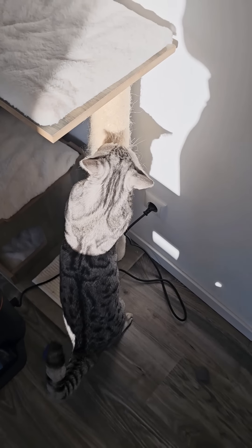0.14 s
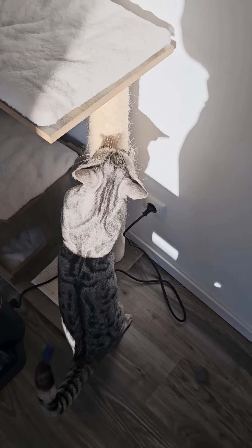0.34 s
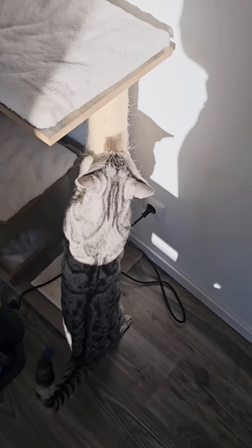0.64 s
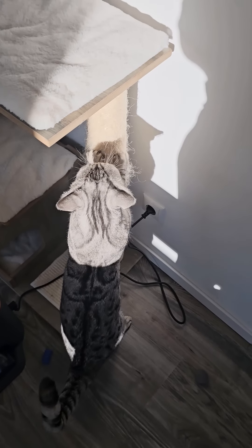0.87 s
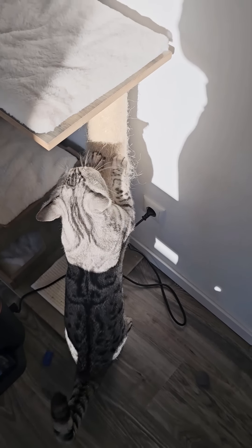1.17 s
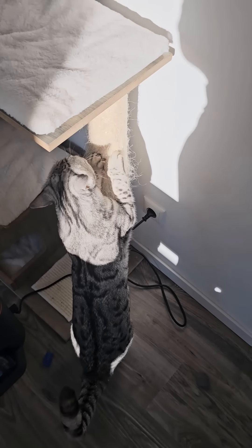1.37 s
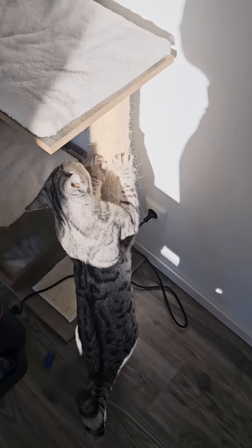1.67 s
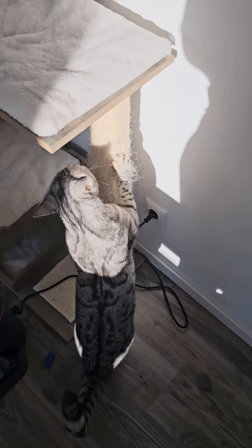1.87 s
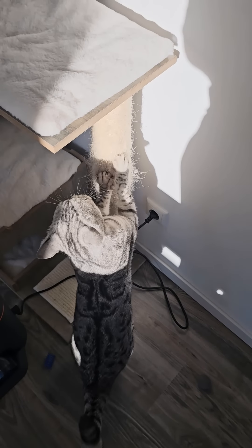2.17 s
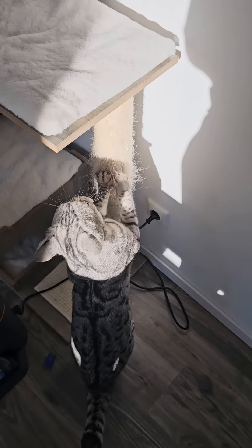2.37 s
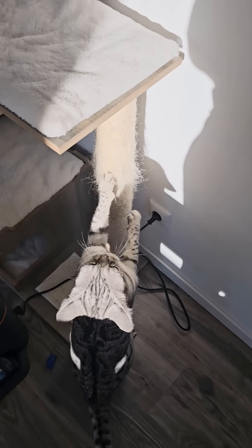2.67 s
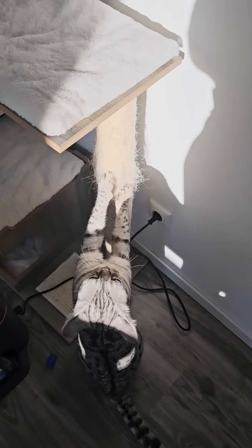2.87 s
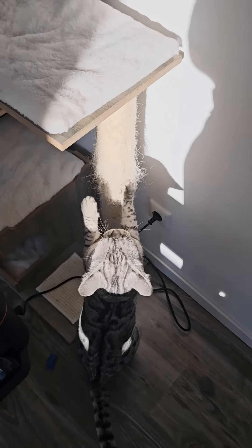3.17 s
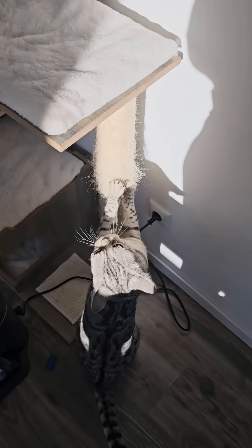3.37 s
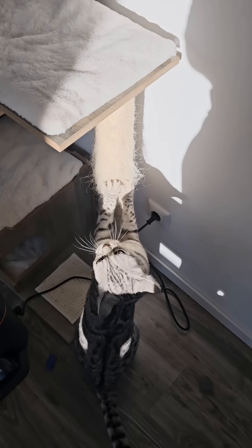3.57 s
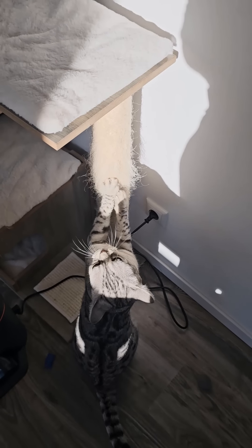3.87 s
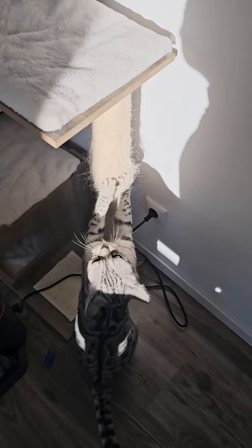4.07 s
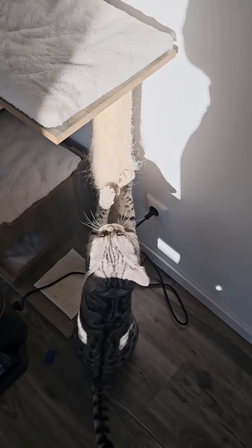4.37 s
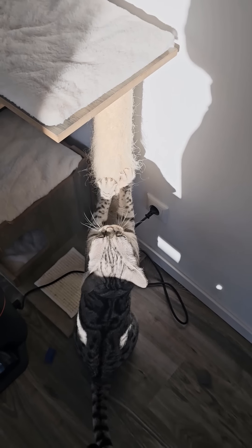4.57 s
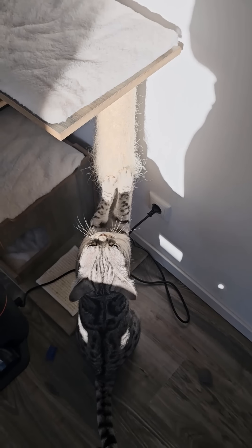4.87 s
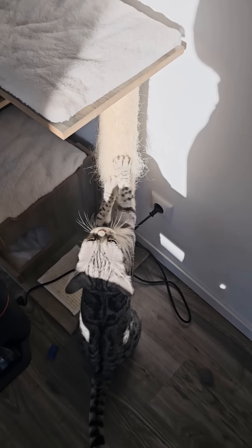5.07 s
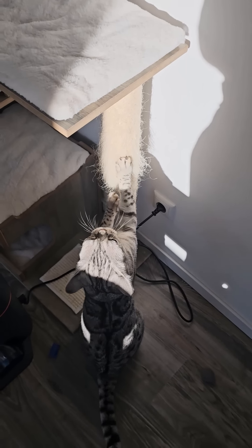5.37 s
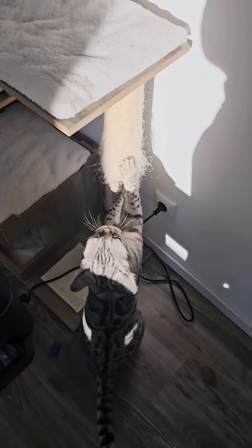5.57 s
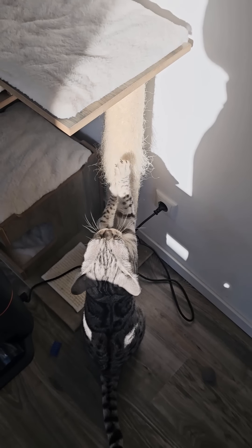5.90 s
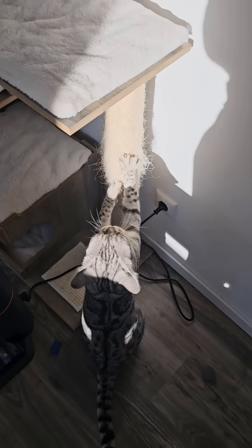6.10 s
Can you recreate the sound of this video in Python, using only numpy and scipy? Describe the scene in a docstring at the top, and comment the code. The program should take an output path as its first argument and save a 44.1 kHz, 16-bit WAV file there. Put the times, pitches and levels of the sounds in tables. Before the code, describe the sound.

A cat claws a rope-wrapped post, heard close in stereo in a bare room with quick reflections and a roughly half-second tail. A crack and hollow knock open at 0.01 s. A dry rustling drag from 0.2 swells into clustered snaps and a thud at 0.45-0.5, followed by weakening rocking bumps. Longer uneven drags run from 0.8 to 1.75, ending in a bright tick, crack and deep thud. Another pull releases in the sharpest crack at 2.33, with low bumps after. Lighter snaps cluster at 3.0-3.1 and 3.5-3.8, then 4.16, with quieter ones at 4.75 and 4.87. A strong double crack with a twangy knock lands at 5.1, rocking the base. From 5.5 to 6.2, two rustling pulls bring stuttering rasps, a soft paw thud near 5.7, ticks, and a weak final tear at 6.17. Faint, steady, low-weighted air remains throughout.

```python
"""Sharp cracks, hollow knocks and low thuds over a dry rustle: a cat claws the rope-wrapped post of
a cat tree in a bare living room. Dying click rattles make the tearing fibres; damped modes make the
hollow post and the frame with its platforms. Coloured click trains make the drag of claws through sisal;
lone ticks, paw pats, rasps and rocking bumps fall between. Reflections and a banded noise tail
make the room, with faint steady air behind."""
import sys
import numpy as np
from scipy import signal
from scipy.fft import rfft, irfft
from scipy.io import wavfile

SR = 44100
rng = np.random.default_rng(int(sys.argv[2]) if len(sys.argv) > 2 else 0)


def transcribe(signal):
    """Save signal, clipped to [-1, 1], as a 16-bit WAV file at the path in sys.argv[1]."""
    frames = np.atleast_2d(signal).T
    limited = np.clip(frames, -1, 1)
    pcm = np.round(limited * 32767).astype(np.int16)
    wavfile.write(sys.argv[1], SR, pcm)


N = 275184
TIME = np.arange(N) / SR

# frame and platform modes: (frequency [Hz], relative level [dB], t60 [s])
FRAME_MODES = [(33.7, -39, 0.46), (60.6, -14.5, 0.97), (75.6, -13, 0.56), (104.4, -7.5, 0.5),
               (133.3, -9.5, 0.7), (154.9, -7, 0.46), (196.9, -2.5, 0.28), (221.96, -0.5, 0.34),
               (250.2, -5, 0.23), (277.7, -7.5, 0.5), (308, -5.5, 0.33)]
# hollow post modes: (frequency [Hz], relative level [dB], t60 [s])
POST_MODES = [(362, -10, 0.023), (447, -5.5, 0.071), (535.6, -2, 0.057), (603, -8, 0.04),
              (688.3, -3.5, 0.087), (813, -1, 0.04), (1064, 2.5, 0.014), (1182.3, 3.5, 0.036),
              (1402, 7, 0.014), (1740, -3, 0.012), (1905, -3.5, 0.034)]
# claws pulling through rope: (start [s], end [s], relative rustle [dB], relative hiss [dB])
CLAW_PULLS = [(0.215, 0.50, -51.5, -51), (0.776, 1.17, -49.5, -55.5), (1.17, 1.30, -44.5, -69),
              (1.356, 1.76, -48.5, -48), (2.075, 2.33, -48.5, -51.5), (2.658, 2.718, -51.5, -68),
              (2.893, 3.14, -46.5, -50), (3.387, 3.79, -51, -57), (4.028, 4.184, -43, -50.5),
              (4.444, 4.77, -50.5, -55.5), (4.948, 5.12, -49.5, -50), (5.476, 5.782, -48, -48),
              (5.80, 6.193, -43.5, -50)]


def from_db(db):
    """Decibels to amplitude gain."""
    return 10 ** (np.asarray(db) / 20)


def rms_one(x):
    """Scale to unit RMS."""
    return x / np.sqrt(np.mean(x ** 2) + 1e-20)


def at_hz(points, hz):
    """Interpolate a (Hz, value) table on a log-frequency axis."""
    point_hz, value = np.transpose(points)
    return np.interp(np.log(np.maximum(hz, 1)), np.log(point_hz), value)


def convolve(x, response):
    """Filter by an impulse response, cut to N samples."""
    return signal.fftconvolve(np.atleast_2d(x), np.atleast_2d(response), axes=-1)[:, :N]


def colour(x, points, size=4096):
    """Minimum-phase filter with the given spectrum; unit power gain for white noise."""
    gain = from_db(at_hz(points, np.fft.rfftfreq(size, 1 / SR)))
    cepstrum = irfft(np.log(gain))
    # fold to the causal half
    cepstrum[1:size // 2] *= 2
    cepstrum[size // 2 + 1:] = 0
    response = irfft(np.exp(rfft(cepstrum)))
    return convolve(x, response / np.linalg.norm(response))


def ring(force, modes, emphasis_db=0):
    """Parallel damped modes; alternating signs let the ring swell after the blow."""
    out = np.zeros(len(force))
    emphasis_db = emphasis_db + np.zeros(len(modes))
    for k, ((hz, db, t60_s), more_db) in enumerate(zip(modes, emphasis_db)):
        radius = from_db(-60 / (t60_s * SR))
        angle = 2 * np.pi * hz / SR
        zeros = [1, -radius * np.cos(angle)]
        poles = [1, -2 * radius * np.cos(angle), radius * radius]
        out += (-1) ** k * from_db(db + more_db) * signal.lfilter(zeros, poles, force + 1e-18)
    return out


def grip(modes, centre_hz, focus_db, octaves, chance_db):
    """The contact place favours modes near one pitch, with random scatter: dB per mode."""
    away = np.log2(np.array(modes)[:, 0] / centre_hz) / octaves
    return focus_db * (np.exp(-away ** 2) - 1) + chance_db * rng.standard_normal(len(modes))


def soften(force, cut_hz):
    """A yielding contact passes only the lower part of a blow."""
    return signal.sosfilt(signal.butter(2, cut_hz, fs=SR, output="sos"), force)


def add(track, s, piece):
    """Mix a piece in at time s."""
    i = max(int(round(s * SR)), 0)
    track[i:i + len(piece)] += piece[:N - i]


def grains(per_s, spread_db, size):
    """Random clicks of uneven strength and random sign."""
    strength = from_db(spread_db * np.minimum(rng.exponential(1, size), 4))
    return (rng.random(size) < per_s / SR) * strength * rng.choice([-1, 1], size)


def tear(tear_s, per_s, first_db, size=4096, evenness=0.55):
    """One fibre gives way and its neighbours follow in a dying rattle; unit energy."""
    rattle = grains(per_s, spread_db=4.5, size=size) * np.exp(-TIME[:size] / tear_s)
    rattle /= np.linalg.norm(rattle) + 1e-9
    rattle[0] = from_db(first_db)
    # many fine fibres fill each other's spectral gaps
    spectrum = rfft(rattle, 2 * size)
    rattle = irfft(spectrum / (abs(spectrum) + 1e-6) ** evenness)[:size]
    return rattle / np.linalg.norm(rattle)


def tension(start_s, end_s):
    """Envelope of one pull: the claw grips, the load swells as the rope tightens, the claw lets go."""
    grip_s, swell_db, let_go_s = 0.017, 6.5, 0.054
    gripped = np.clip((TIME - start_s) / grip_s, 0, 1)
    released = np.clip(1 - (TIME - end_s) / let_go_s, 0, 1)
    return gripped * released * from_db(np.interp(TIME, [start_s, end_s], [-swell_db, 0]))


def diffuse_noise():
    """Stereo noise from all around: alike at both sides in the bass, unrelated in the treble."""
    # stereo width: (frequency [Hz], side minus mid [dB])
    side_width = [(60, -13), (200, -13.5), (380, -9), (700, -2.5), (1300, 0), (16000, 0.5)]
    mid, side = rfft(rng.standard_normal((2, N)))
    width = from_db(at_hz(side_width, np.fft.rfftfreq(N, 1 / SR)))
    return irfft((mid + width * side * [[1], [-1]]) / np.sqrt(1 + width ** 2), N)


def air():
    """Steady room air: diffuse noise with a fixed spectrum."""
    # air spectrum: (frequency [Hz], relative density [dB])
    air_spectrum = [(15, -38), (25, 6), (40, -15), (65, -1), (120, -2), (170, -19), (245, 3.5),
                    (310, -10.5), (400, -17.5), (700, -19.5), (1800, -25.5), (4500, -26.5), (7400, -33),
                    (9800, -36), (11600, -31.5), (16000, -35.5)]
    air_rms_db = -45
    return from_db(air_rms_db) * rms_one(colour(diffuse_noise(), air_spectrum))


def snaps(rows):
    """Each release cracks and plucks the rope, knocks the post and lets the loaded frame spring back."""
    # crack spectrum: (frequency [Hz], relative density [dB])
    crack_spectrum = [(300, -30.5), (900, 0), (2000, 8.5), (3200, 6), (4800, 1), (6000, -4), (7300, -1),
                      (9800, -6), (11500, -6), (13500, -14.5), (16000, -9.5)]
    # coil twang: (time [s], level against knock [dB])
    twang_levels = [(0.4, 1), (2.4, -1), (3.6, 1.5), (4.2, 6), (5.1, 11.5)]
    coil_hz, knock_hz = 1238, 1260
    lead_db, lead_in_s = -24.5, 0.011  # against the crack; build-up time constant
    fray_db, fray_s = -16, 0.053  # against the crack; decay time constant
    crack, body = np.zeros((2, N))
    octave = np.log2(np.maximum(np.fft.rfftfreq(4096, 1 / SR), 1000) / 6000)
    spring = soften(signal.unit_impulse(SR), cut_hz=540)
    for s, crack_db, knock_db, thud_db, tear_s, thud_hz, tilt_db in rows:
        rip = tear(tear_s, per_s=4000, first_db=-4)
        tilted = irfft(rfft(rip) * from_db(tilt_db * octave))
        add(crack, s, from_db(crack_db) * tilted[:len(rip) // 2])
        # a faint reversed swell leads into each release
        lead_in = tear(lead_in_s, per_s=2500, first_db=-37)[:int(s * SR)][::-1]
        add(crack, s - len(lead_in) / SR, from_db(crack_db + lead_db) * lead_in)
        # frayed strands crackle on as the claw slides out
        fray = tear(fray_s, per_s=900, first_db=-34, size=8192)
        add(crack, s, from_db(crack_db + fray_db) * fray)

        pull = soften(tear(tear_s, per_s=2700, first_db=-1), cut_hz=1300)
        post_grip = grip(POST_MODES, knock_hz, focus_db=1.5, octaves=0.35, chance_db=3.0)
        post = ring(pull, POST_MODES, post_grip)
        twang_db = np.interp(s, *np.transpose(twang_levels))
        coil = ring(pull, [(coil_hz, twang_db, .018)])
        add(body, s, from_db(knock_db - 4.0) * (post + coil))

        # short post recoil, longer frame ring
        recoil = ring(spring, [(thud_hz, 2, .05)])
        frame_grip = grip(FRAME_MODES, thud_hz, focus_db=4.5, octaves=0.35, chance_db=2.5)
        frame = ring(spring, FRAME_MODES, frame_grip)
        add(body, s, from_db(thud_db - 7) * (recoil + frame))
    return from_db(19.5) * colour(crack, crack_spectrum) + body


def stick_slip():
    """Uneven gain of a claw that keeps catching and sliding on."""
    slips_per_s, slip_db = 35.0, 2.5
    steps = rng.standard_normal(1000)
    return from_db(slip_db * np.interp(TIME * slips_per_s, np.arange(len(steps)), steps))


def drag():
    """Claws slip over countless fibres; the pull keeps the post murmuring and the tree rumbling."""
    # rustle spectrum: (frequency [Hz], relative density [dB])
    rustle_spectrum = [(400, 4), (1000, -3.5), (1800, -2.5), (2800, 3.5), (4400, -1.5), (6000, -9.5),
                       (7400, -3.5), (9800, -10), (11500, -28), (16000, -18)]
    # hiss of fur and loose fibres: (frequency [Hz], relative density [dB])
    hiss_spectrum = [(1000, -43), (4000, 0), (7400, -4), (9800, 0.5), (11500, 2), (13500, -6.5),
                     (16000, -7)]
    post_rub_db = -7.5  # against the rustle
    rustle, hiss = np.zeros((2, N))
    for start_s, end_s, rustle_db, hiss_db in CLAW_PULLS:
        load = tension(start_s, end_s)
        rustle += from_db(rustle_db) * load
        hiss += from_db(hiss_db) * load
    fibres = rms_one(colour(grains(2500, spread_db=4.0, size=N), rustle_spectrum))
    fluff = rms_one(colour(grains(1500, spread_db=4.0, size=N), hiss_spectrum))
    rub = rms_one(ring(grains(900, spread_db=4.0, size=N), POST_MODES))
    shaking = soften(grains(400, spread_db=2.0, size=N), cut_hz=580)
    shake = rms_one(ring(shaking, FRAME_MODES))
    pulled = rustle * (fibres + from_db(post_rub_db) * rub + shake)
    return from_db(-5.5) * stick_slip() * (pulled + hiss * fluff)


def ticks():
    """Lone fibres break with a thin, bright click: thick ones at set times, thin ones at random under load."""
    # thick fibres breaking: (time [s], relative level [dB])
    thick = [(0.293, -32.5), (0.5803, -23), (0.8228, -34.5), (0.8624, -36.5), (1.0323, -34.5),
             (1.1438, -29.5), (1.483, -32), (1.6557, -30.5), (1.7476, -13.5), (1.9703, -29), (2.312, -26.5),
             (4.121, -30.5), (5.7628, -23), (6.014, -25.5)]
    # tick spectrum: (frequency [Hz], relative density [dB])
    fibre_spectrum = [(400, 1.5), (1500, 5), (4000, 1.5), (8000, 0), (12000, 0.5), (16000, 2)]
    thin_per_s, thin_db, thin_spread_db = 22.0, -44, 3  # rate at full load
    force = np.zeros(N)
    load = sum(tension(start_s, end_s) for start_s, end_s, *_ in CLAW_PULLS)
    thin_times = TIME[rng.random(N) < load * thin_per_s / SR]
    thin = [(s, thin_db + thin_spread_db * rng.standard_normal()) for s in thin_times]
    for s, db in thick + thin:
        add(force, s, from_db(db) * tear(0.0013, per_s=5400, first_db=8.0))
    return from_db(13.0) * colour(force, fibre_spectrum)


def pats():
    """A padded paw or the rocking base gives a soft push that only shakes the frame."""
    # paws landing: (time [s], relative level [dB], centre [Hz])
    landings = [(0.344, -21.5, 139), (0.82, -33.5, 256), (1.488, -28.5, 245), (2.109, -32.5, 191),
                (3.36, -39, 244), (5.69, -20.5, 222)]
    out = np.zeros(N)
    push = soften(signal.unit_impulse(SR), cut_hz=355)
    for s, db, hz in landings + rocking(count=3):
        bump = ring(push, [(hz, 2, .08)])
        frame_grip = grip(FRAME_MODES, hz, focus_db=5, octaves=0.5, chance_db=2.5)
        frame = ring(push, FRAME_MODES, frame_grip)
        add(out, s, from_db(db - 15.5) * (bump + frame))
    return out


def rasps():
    """A claw stutters over the coils and makes the hollow post sound."""
    # rasps: (time [s], length [s], relative level [dB], centre [Hz])
    strokes = [(.407, 0.005, -37, 1600), (1.019, 0.15, -50, 1400), (1.671, 0.0074, -33.5, 1650),
               (3.799, 0.013, -31, 1050), (4.084, 0.063, -45, 1500), (5.638, 0.048, -38.5, 1240),
               (5.664, 0.14, -43.5, 740), (5.976, 0.053, -43, 1210), (6.149, 0.035, -35, 1200)]
    out = np.zeros(N)
    for s, length_s, db, hz in strokes:
        stroke = np.sqrt(np.hanning(max(int(length_s * SR), 16)))
        force = stroke * rms_one(grains(2000, spread_db=7.5, size=len(stroke)))
        force = soften(np.pad(force, (0, SR // 10)), cut_hz=3600)
        post_grip = grip(POST_MODES, hz, focus_db=4, octaves=0.87, chance_db=0.5)
        add(out, s, from_db(db - 28.5) * ring(force, POST_MODES, post_grip))
    return out


def rocking(count):
    """The base settles in a run of bumps, each weaker and lower: rows of (s, relative dB, Hz)."""
    # tree rocking on its base: (first bump [s], relative level [dB], centre [Hz])
    rocks = [(0.516, -16, 267), (1.789, -11, 205), (2.404, -10, 200), (4.2, -24.5, 253),
             (5.139, -16.5, 185)]
    spacing_s, loss_db, pitch_ratio = .056, 5, 0.865
    return [(s + k * spacing_s, db - k * loss_db, hz * pitch_ratio ** k)
            for s, db, hz in rocks for k in range(count)]


def room(x, wet_db, early_db, early_s, onset_s):
    """Direct path and near reflections, a quick furniture scatter, then a tail that dies band by band."""
    # decay: (frequency [Hz], t60 [s])
    band_t60 = [(60, 1.5), (160, 0.55), (420, 0.65), (1100, 0.54), (3000, 0.51), (8000, 0.57),
                (16000, 0.36)]
    # reverberation: (frequency [Hz], relative level [dB])
    band_wet = [(60, -9.5), (250, -2), (700, 0), (2000, -2.5), (6000, -2), (16000, -4)]
    # direct path, then wall and floor: (delay [s], gain [dB], lead of the left side [s])
    near_paths = [(.0006, 4, .00016), (.0017, -5, -.00025), (.0038, -8, .00015), (.0053, -10.5, .0003)]
    t, hz = TIME[:SR], np.fft.rfftfreq(SR, 1 / SR)
    spectra = []
    for side in (-1, 1):
        spectra.append(sum(from_db(db) * np.exp(-2j * np.pi * hz * (delay_s + max(side * lead_s, 0)))
                           for delay_s, db, lead_s in near_paths))
    near = irfft(spectra, SR)
    near[:, SR // 2:] = 0

    noise, tail = rfft(diffuse_noise()[:, :SR]), 0
    centres_hz = np.geomspace(60, 16000, 12)
    for centre_hz, own in zip(centres_hz, np.eye(len(centres_hz))):
        band = irfft(noise * at_hz(np.c_[centres_hz, own], hz), SR)
        late = np.exp(-np.log(1000) * t / at_hz(band_t60, centre_hz))
        scatter = from_db(early_db) * np.exp(-t / early_s)
        decay = (late + scatter) * (1 - np.exp(-t / onset_s))
        tail = tail + band * decay / np.linalg.norm(decay) * from_db(at_hz(band_wet, centre_hz))
    return convolve(x, near + from_db(wet_db) * tail)


def scene():
    """Three groups of sounds, each with its own random room tail, as from shifting paws; air behind."""
    # claws tearing free: (time [s], relative crack [dB], relative knock [dB], relative thud [dB],
    # tear time constant [s], thud centre [Hz], crack tilt [dB/octave])
    releases = [(0.0111, -19.5, -24, -20.5, 0.0011, 224, 1), (0.4441, -26.5, -29, -24.5, 0.002, 262, -4),
                (0.4876, -22.5, -45, -19.5, .0021, 250, 0), (0.4945, -15.5, -17.5, -17, 0.0011, 266, 1),
                (1.0827, -29.5, -35, -26, 0.0024, 250, 0.5), (1.712, -34, -37, -28.5, .0013, 270, 10.5),
                (1.7508, -18, -17.5, -14, 0.0019, 182, 2.5), (2.3302, -12, -21, -16, 0.0021, 277, 2.5),
                (2.3439, -23.5, -21.5, -37, 0.0022, 213, 10), (2.3604, -32, -23, -18, 0.0063, 234, -3),
                (3.014, -27.5, -33, -32, 0.0017, 237, 2), (3.0629, -27, -28, -30.5, 0.0017, 295, 1),
                (3.124, -21, -19, -25, 0.0028, 246, 4), (3.4772, -22.5, -28, -32, 0.0013, 247, 2.5),
                (3.5875, -17, -22, -23, 0.0065, 306, 2), (3.6036, -25, -21.5, -21, .002, 300, 5.5),
                (3.6686, -20.5, -22.5, -25.5, 0.0015, 305, 4), (3.7976, -24.5, -27, -40, 0.0018, 283, 1),
                (4.1566, -21, -24.5, -18.5, 0.00091, 246, 0), (4.1718, -38, -31.5, -27.5, 0.0016, 233, 8),
                (4.7468, -27, -32.5, -26, 0.0022, 314, -1), (4.8736, -30, -39, -30.5, 0.0022, 278, -2.5),
                (5.1055, -14.5, -23, -40, 0.0016, 300, 3), (5.1098, -17.5, -18.5, -20, 0.0034, 220, -3.5),
                (6.1727, -28, -43, -26.5, 0.0085, 246, 2)]
    first, second, third = [snaps(releases[k::3]) for k in range(3)]
    spots = [first + ticks(), second + pats() + rasps(), third + drag()]
    cat = sum(room(x, wet_db=7.0, early_db=5.5, early_s=0.011, onset_s=0.00087) for x in spots)
    return cat * from_db([[.5], [-.5]]) + air()  # left 1 dB louder


def record(dry):
    """Clip at full scale, then cut the top with a steep low-pass."""
    cutoff_hz = 16100
    low_pass = signal.ellip(10, .2, 70, cutoff_hz, fs=SR, output="sos")
    return signal.sosfilt(low_pass, np.clip(dry, -1, 1))


dry = scene()
out = record(dry)
transcribe(out)
```